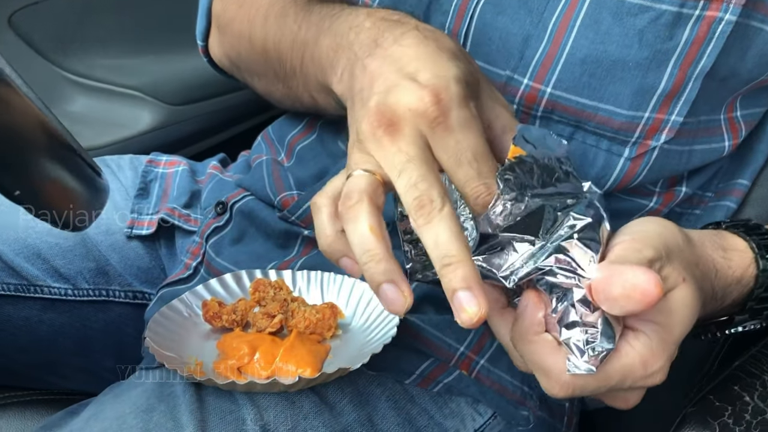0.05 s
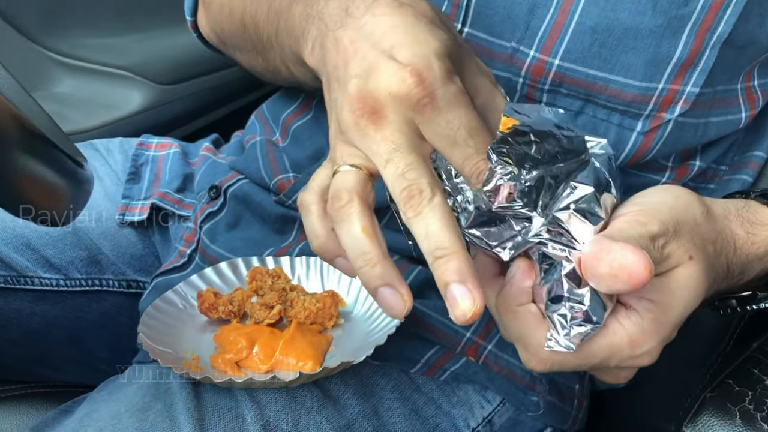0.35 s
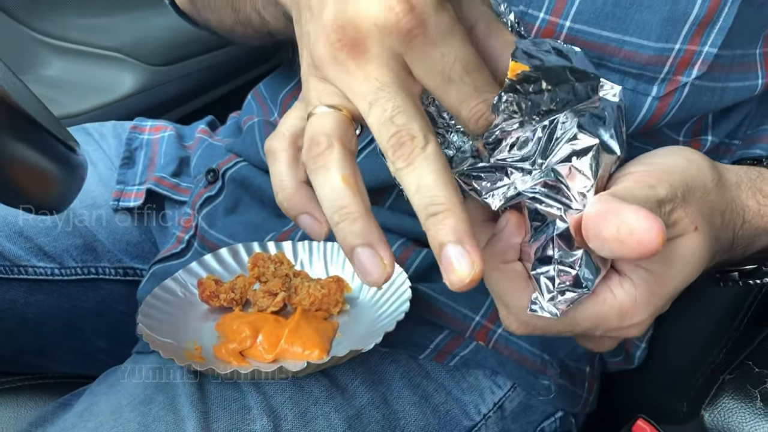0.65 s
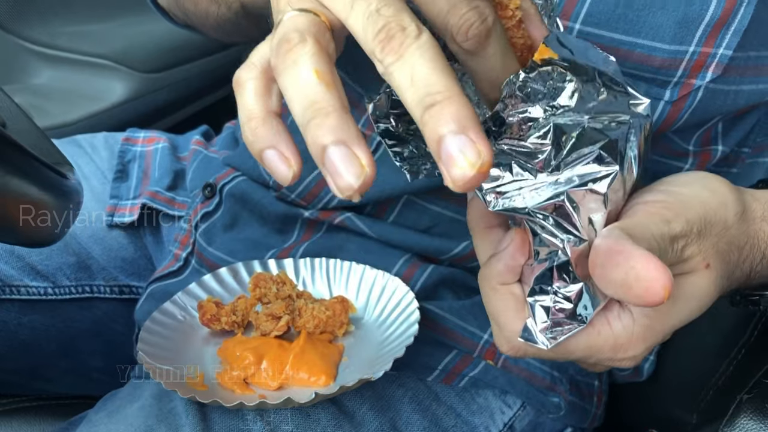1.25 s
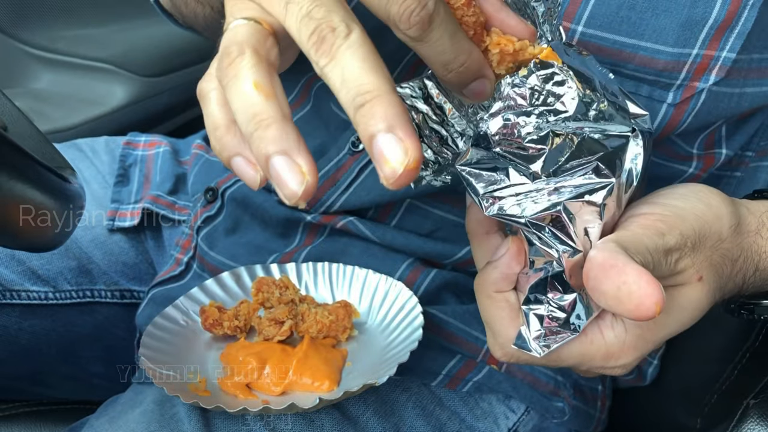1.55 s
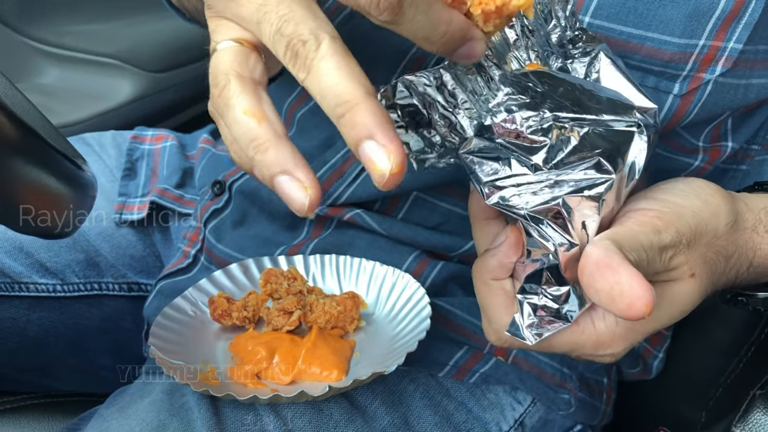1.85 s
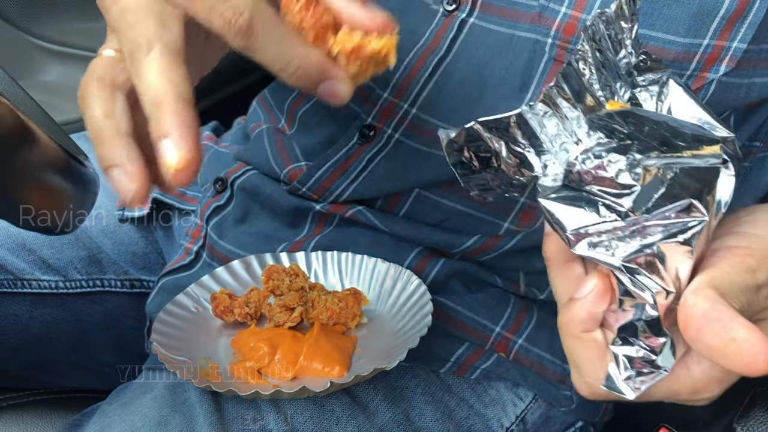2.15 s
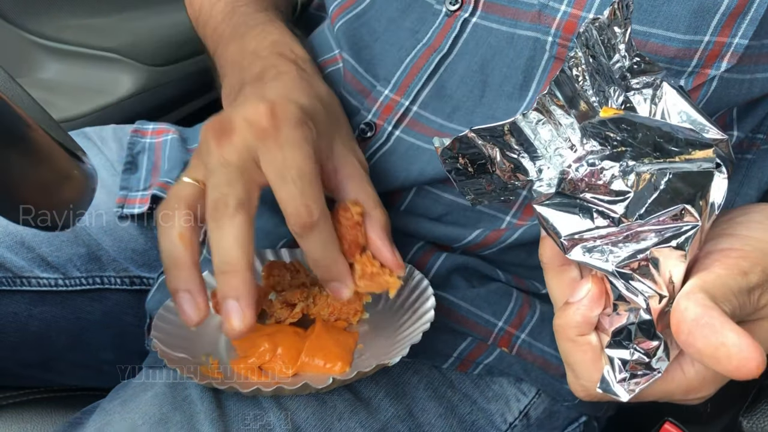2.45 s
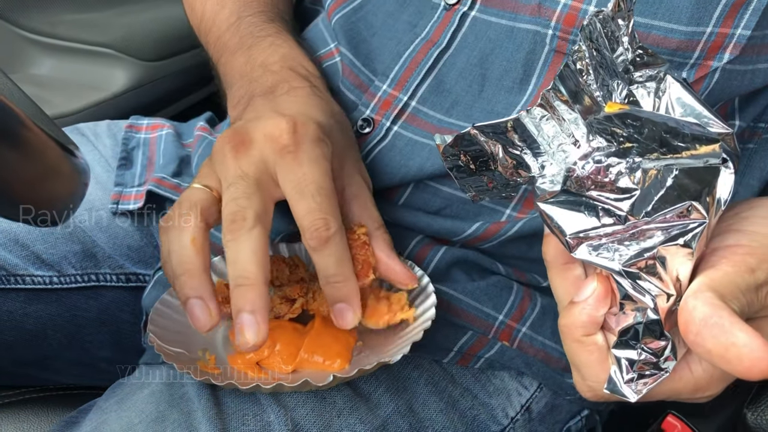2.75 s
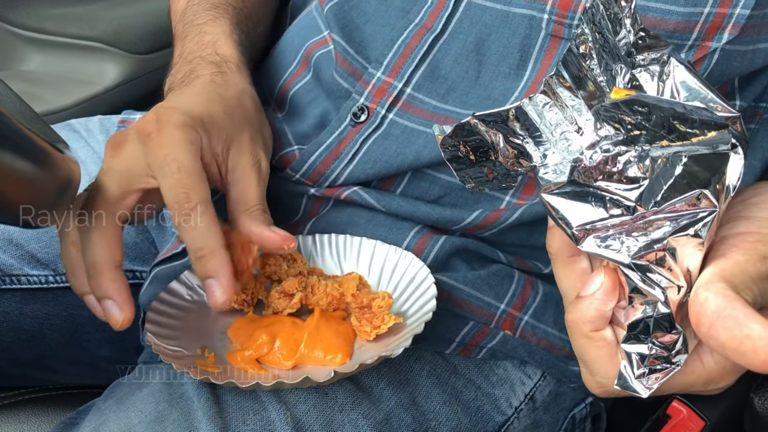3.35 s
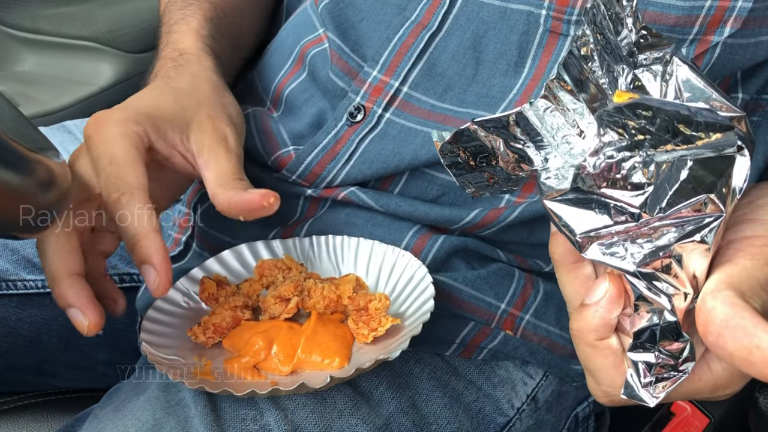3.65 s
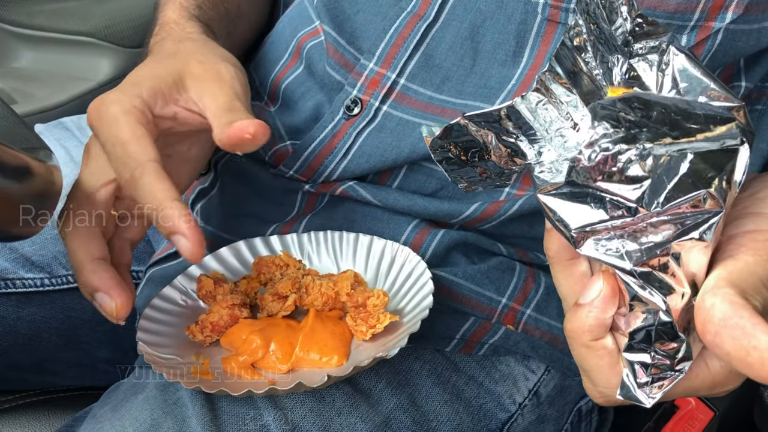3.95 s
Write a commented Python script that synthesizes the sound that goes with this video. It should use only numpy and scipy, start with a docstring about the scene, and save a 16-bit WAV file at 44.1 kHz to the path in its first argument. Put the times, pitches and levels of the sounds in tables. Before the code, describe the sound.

A foil pouch crinkles and snaps sharply as fried food is worked out of it. The foil settles, then light ticks and a soft drop land on a paper plate, close to the microphone in a quietly rumbling car.

```python
"""Inside a quiet parked car, one microphone close to a foil pouch and a paper plate on a lap.
From the start, over the cabin's low rumble, a piece of fried food is worked out of the pouch: creases
snap, each with its own short ring, amid fine crinkles and the dull flexing of the sheet.
By 2.3 s the foil has settled, and crust and fingers tick on the plate.
Near 3.5 s the food drops onto it with a short skid, and a sleeve rustles as the hand draws back."""
import sys
import numpy as np
from scipy import signal
from scipy.fft import rfft, irfft, next_fast_len
from scipy.io import wavfile

SR = 44100
rng = np.random.default_rng(int(sys.argv[2]) if len(sys.argv) > 2 else 0)


def unload_audio(sound):
    """Save the sound as a 16-bit wav file, at the path given as the first command line argument."""
    columns = np.transpose(np.atleast_2d(sound))
    # keep every value between -1 and 1, then stretch to whole-number steps
    steps = np.round(np.clip(columns, -1, 1) * 32767)
    wavfile.write(sys.argv[1], SR, steps.astype(np.int16))


N = 176400

# foil creases snapping: (time [s], level [dB], ring [Hz], treble [dB])
CREASE_SNAPS = [(0.0111, -20.5, 6200, -13), (0.0188, -15.5, 6700, 15), (0.0358, -15, 7300, 14),
                (0.0604, -27, 7400, 4), (0.0725, -20, 6700, -3.5), (0.0861, -27, 1960, -3),
                (0.1732, -26.5, 3500, 3), (0.192, -23.5, 1650, -3.5), (0.2329, -30.5, 3440, 1.5),
                (0.2932, -31.5, 5940, 3), (0.3146, -30, 1800, 6), (0.3321, -28, 9100, -9),
                (0.3644, -24, 2640, -5), (0.3774, -22, 1690, -6), (0.3959, -24.5, 4030, -16),
                (0.4065, -32, 5000, 3), (0.422, -18, 8350, -2), (0.4384, -21.5, 1520, -1),
                (0.453, -30, 4900, 16), (0.4573, -22, 12200, -7), (0.4973, -25.5, 5450, -11),
                (0.5156, -17.5, 6980, -6.5), (0.5415, -19.5, 5030, -3.5), (0.5442, -18, 1780, 8),
                (0.555, -23, 11200, -3), (0.588, -21, 5050, -5.5), (0.6211, -25, 5470, -1),
                (0.6392, -28, 3700, -11), (0.6514, -24.5, 1500, -5), (0.7071, -27, 2730, -37),
                (0.7394, -26.5, 2500, -18), (0.7525, -33, 2410, -31), (0.7923, -18, 6060, -10.5),
                (0.795, -20.5, 2970, 8), (0.8151, -22, 3020, 3), (0.8435, -12, 5470, 5),
                (0.845, -22.5, 1600, 8), (0.8537, -24, 9800, 17), (0.8617, -24, 12500, 9),
                (0.8717, -31, 11000, 3), (0.8744, -20, 1500, -4), (0.8997, -29, 5500, 3),
                (0.9061, -25.5, 4540, -6), (0.9346, -20.5, 2360, -9), (0.94, -23.5, 4300, 6),
                (0.9491, -21, 10700, -4), (1.0023, -23.5, 2240, -7), (1.016, -27.5, 6120, -1),
                (1.083, -19.5, 3770, -4.5), (1.0941, -29, 2900, -3), (1.1237, -15.5, 3300, -2.5),
                (1.1508, -28.5, 1840, -25), (1.1585, -29, 1850, -5), (1.1812, -21, 1400, -7.5),
                (1.2129, -31, 4330, -19), (1.2277, -26, 7000, -6), (1.2492, -22, 6300, 0),
                (1.2522, -20, 2630, -10.5), (1.2729, -28, 5500, -8), (1.3098, -33, 4120, -38),
                (1.3512, -31, 4700, -9), (1.404, -33, 1720, -23), (1.441, -27.5, 9100, -5),
                (1.4644, -30, 4900, -7), (1.484, -33, 1420, -21), (1.5102, -34, 1690, -12),
                (1.5197, -34, 2730, -15), (1.5279, -30, 4300, -3), (1.6005, -44.5, 1660, -47),
                (1.6632, -33.5, 2680, -12), (1.8127, -37, 5150, -11.5), (1.9453, -34, 980, -10.5),
                (1.969, -33.5, 1540, -15), (2.0703, -30.5, 3000, -13), (2.0735, -42, 1700, -22),
                (2.1025, -43.5, 2090, -15), (2.1772, -47, 1760, -30), (2.1926, -42, 1440, -5)]
# spectrum of a crack: (frequency [Hz], level [dB])
CRACK_SPECTRUM = [(100, -7.5), (300, -13), (1000, -7), (1800, -2.5), (8000, 2.5), (16000, -1)]
# fine crinkling, following how hard the foil is worked: (time [s], level [dB])
CRINKLE_LEVEL = [(0, -26), (.04, -31.5), (.095, -37.5), (.215, -49), (.283, -60), (.3, -38.5), (.35, -44.5),
                 (.42, -35.5), (.46, -43), (.488, -53), (.51, -33.5), (.535, -35), (.55, -28),
                 (.605, -45.5), (.7, -41.5), (.745, -42.5), (.78, -52), (.8, -34.5), (.85, -28.5),
                 (.89, -49), (.945, -45), (.98, -48.5), (1.01, -33), (1.1, -36), (1.26, -41.5), (1.31, -48),
                 (1.5, -51.5), (1.57, -68), (1.84, -59.5), (1.91, -65.5), (1.97, -57), (2.03, -72),
                 (2.18, -65), (2.26, -81)]
# spectrum of the crinkling: (frequency [Hz], level [dB])
CRINKLE_SPECTRUM = [(1100, -7), (1700, -2.5), (2500, -1), (4500, -2), (13500, -8.5), (16000, -10.5)]
# dull flexing of the pouch: (time [s], level [dB])
FLEX_LEVEL = [(0, -43), (.12, -47.5), (.27, -60), (.33, -50.5), (.49, -52), (.54, -43.5), (.62, -46.5),
              (.77, -53.5), (.84, -38), (.9, -56), (.98, -49.5), (1.03, -45), (1.17, -44), (1.25, -43),
              (1.5, -52.5), (1.6, -61), (1.96, -57.5), (2.25, -68)]
# spectrum of the flexing: (frequency [Hz], level [dB])
FLEX_SPECTRUM = [(90, -23.5), (170, -12.5), (250, -2.5), (460, 3.5), (750, -5), (1050, -2.5), (4000, -27)]
# a whole panel buckles: (time [s], level [dB], pitch [Hz])
PANEL_BUCKLES = [(0.539, -35, 627), (0.839, -35, 250), (1.221, -36.5, 221), (1.258, -34, 205)]
# hollow resonances of the pouch: (frequency [Hz], width [Hz], gain [dB])
POUCH_RESONANCES = [(772, 86, 0.5), (1410, 85, -8.5), (1734, 70, 0.5)]
# food rubbing along the inside of the pouch: (time [s], level [dB])
RUB_LEVEL = [(1.0, -55), (1.45, -53.5), (1.56, -67), (2.18, -68), (2.3, -97)]
# crust and fingers ticking on the plate: (time [s], level [dB], ring [Hz], treble [dB])
PLATE_TICKS = [(2.4268, -36, 4470, -14), (2.481, -48.5, 1680, -21), (2.5399, -44.5, 2180, -21),
               (2.5784, -54, 2150, -32), (2.753, -52.5, 6960, 4), (2.9577, -40, 4650, -3),
               (3.0047, -45, 1590, -30), (3.1159, -42, 1470, -70), (3.216, -56.5, 1220, -68),
               (3.4764, -48.5, 1080, -16.5), (3.5365, -38.5, 1480, -8), (3.5443, -36, 1380, -30),
               (3.5548, -26, 4140, -22), (3.5664, -34, 5700, -8), (3.5972, -39, 2000, -9),
               (3.6141, -42, 1430, -31)]
# the food lands on the plate: (time [s], level [dB])
FOOD_LANDINGS = [(3.546, -42), (3.598, -35), (3.607, -45), (3.614, -54)]
# modes of the plate on the lap: (frequency [Hz], gain [dB], t60 [s])
PLATE_MODES = [(103, -1, 0.088), (241, 5.5, 0.047), (430, 10, 0.027), (640, -1, 0.065), (746, -2, 0.044)]
# the sleeve drawing back over the clothes: (time [s], level [dB])
SLEEVE_LEVEL = [(3.4, -72), (3.55, -56)]
# spectrum of the cabin's rumble: (frequency [Hz], level [dB])
RUMBLE_SPECTRUM = [(32, -34), (42, -1), (75, 1.5), (105, -6), (140, -7), (190, -17), (280, -14),
                   (400, -21.5), (700, -27), (1050, -38), (2400, -44.5), (16000, -49.5)]
# low hums of the cabin: (frequency [Hz], width [Hz], level [dB])
CABIN_HUMS = [(60.8, 12, -49.5), (255, 14.4, -62.5), (308.7, 7.5, -62.5)]
# a low drone swells and fades: (time [s], level [dB])
DRONE_LEVEL = [(0, -66), (1.8, -47), (2.15, -53), (2.32, -47.5), (2.44, -58), (2.58, -40.5), (2.72, -61),
               (4, -56)]
# a faint hiss rises near the end: (time [s], level [dB])
HISS_LEVEL = [(3.3, -77), (3.6, -71.5)]


def snaps(rows, material_db=0, size=2048):
    """A crease gives way in two cracks; its facet rings and pings, and the sheet shivers after it."""
    crack_s, ping_s, ring_cycles = 0.00045, 0.003, 2.2  # decays to 1/e
    level_window_s = 0.0019  # a snap's level is its energy spread over this time
    out, t = np.zeros(N), np.arange(size) / SR
    for s, db, hz, treble_db in rows:
        burst, shiver, rattle = rng.standard_normal((3, size))
        since_second = t - 0.0011 * rng.uniform(.5, 1.7)
        second_step = from_db(-6.5) * (since_second > 0) * np.exp(-np.abs(since_second) / crack_s)
        steps = np.exp(-t / crack_s) + second_step
        noise = rms_one(burst * steps) + from_db(-1) * rms_one(shiver * dying(t, t60=0.04))
        treble_shelf = [(min(4900, 2 * hz), 0), (10660, treble_db)]
        crack = colour(colour(noise, CRACK_SPECTRUM), treble_shelf)
        ring = np.sin(2 * np.pi * hz * t) * np.exp(-t * hz / ring_cycles)
        ping = resonate(rattle * np.exp(-t / ping_s), hz, width_hz=250)
        facet = from_db(-7.5) * rms_one(ring) + from_db(-9) * rms_one(ping)
        # light snaps ring in one facet; hard ones shake the whole sheet
        lightness_db = 1.5 * np.tanh((-34.5 - db) / 10)
        dullness_db = -0.36 * max(treble_db, -16)  # dull snaps are the most pitched
        snap = rms_one(rms_one(crack) + from_db(material_db + lightness_db + dullness_db) * facet)
        add(out, s, from_db(db) * np.sqrt(level_window_s * SR / size) * snap)
    return out


def crinkles(size=512):
    """Tiny creases give way by the hundred; each shivers briefly at a pitch of its own."""
    shiver_s, ring_cycles = 0.001, 1.8  # decays to 1/e
    settled = int(CRINKLE_LEVEL[-1][0] * SR)
    clicks = random_clicks(per_s=1900, spread_db=2.5)
    rings, fade = np.zeros(N), np.exp(-np.arange(size) / SR / shiver_s)
    for i in np.flatnonzero(clicks[:settled]):
        hz = np.exp(rng.uniform(np.log(1200), np.log(15000)))
        facet = resonate(rng.standard_normal(size) * fade, hz, hz / ring_cycles / np.pi)
        add(rings, i / SR, clicks[i] * np.sqrt(hz) * rms_one(facet))
    rings = colour(rings, CRINKLE_SPECTRUM)
    return from_db(-1.5) * level(CRINKLE_LEVEL) * rings / np.std(rings[:settled])


def flexing(buckle_width_hz=103):
    """Larger panels give with soft, low pops, and now and then buckle with a dull shudder."""
    pops = colour(random_clicks(per_s=450, spread_db=3.5), FLEX_SPECTRUM)
    out, t = level(FLEX_LEVEL) * rms_one(pops), np.arange(SR // 4) / SR
    for s, db, hz in PANEL_BUCKLES:
        band = resonate(rng.standard_normal(len(t)), hz, buckle_width_hz)
        shudder = resonate(band, hz, buckle_width_hz)
        add(out, s, from_db(db) * rms_one(shudder) * dying(t, t60=0.11))
    return out


def pouch(x, block=256, shapes=33, wander=0.06):
    """The half-open pouch adds hollow resonances that wander as the hands reshape it."""
    out, starts = x.copy(), np.arange(0, N, block)
    for hz, width_hz, db in POUCH_RESONANCES:
        drift = np.interp(starts, np.linspace(0, N, shapes), rng.standard_normal(shapes))
        r, state = np.exp(-np.pi * width_hz / SR), np.zeros(2)
        for i, centre_hz in zip(starts, hz * np.exp(wander * drift)):
            poles = [1, -2 * r * np.cos(2 * np.pi * centre_hz / SR), r * r]
            ring, state = signal.lfilter([1, 0, -1], poles, x[i:i + block] + 1e-18, zi=state)
            out[i:i + block] += from_db(db) * (1 - r * r) / 2 * ring
    return out


def rub():
    """The food rubs along the inside of the pouch on its way out."""
    return level(RUB_LEVEL) * narrow_noise(hz=1700, width_hz=460)


def ticks():
    """Crust and fingers tick on the plate; paper rings less than foil."""
    return from_db(-1) * snaps(PLATE_TICKS, material_db=-2)


def landings():
    """Each landing of the food strikes the low modes of the paper plate."""
    out, t = np.zeros(N), np.arange(SR // 4) / SR
    attack = 1 - np.exp(-t / 0.00038)  # the food is soft
    for s, db in FOOD_LANDINGS:
        signs = rng.choice([-1, 1], len(PLATE_MODES))
        thud = sum(sign * from_db(db + mode_db) * np.sin(2 * np.pi * hz * t) * dying(t, t60)
                   for sign, (hz, mode_db, t60) in zip(signs, PLATE_MODES))
        add(out, s, attack * thud)
    return out


def skid(start_s=3.543):
    """Grains of crust catch on the paper in a short, rough scrape as the food lands."""
    out, t = np.zeros(N), np.arange(N) / SR
    grains = resonate(random_clicks(per_s=1900, spread_db=2.5), hz=1900, width_hz=960)
    add(out, start_s, from_db(-46) * rms_one(grains) * dying(t, t60=0.16))
    return out


def sleeve(hz=190, width_hz=203):
    """Cloth slides over cloth with a soft, low rustle."""
    rustle = resonate(narrow_noise(hz, width_hz), hz, 2 * width_hz)
    return level(SLEEVE_LEVEL) * rms_one(rustle)


def cabin_reflections(x, cutoff_hz=9400):
    """The direct sound reaches the microphone first, then the short, dull tail of the cabin."""
    t = np.arange(SR // 4) / SR
    reflections = rng.standard_normal(len(t)) * (t > .001)
    tail = signal.lfilter(*signal.butter(1, cutoff_hz, fs=SR), reflections) * dying(t, t60=0.11)
    return x + from_db(-14.5) * signal.fftconvolve(x, tail / np.linalg.norm(tail))[:N]


def cabin_tone():
    """Room tone of the parked car: low rumble, hums, a swelling drone and a faint hiss."""
    rumble = from_db(-46) * rms_one(colour(rng.standard_normal(N + SR), RUMBLE_SPECTRUM)[SR:])
    hums = sum(from_db(db) * narrow_noise(hz, width_hz) for hz, width_hz, db in CABIN_HUMS)
    drone = level(DRONE_LEVEL) * narrow_noise(hz=108.3, width_hz=5.7)
    hiss = level(HISS_LEVEL) * narrow_noise(hz=3350, width_hz=810)
    return rumble + hums + drone + hiss


def from_db(db):
    """Decibels to gain."""
    return 10 ** (np.asarray(db) / 20)


def rms_one(x):
    """Scale to rms 1."""
    return x / np.sqrt(np.mean(x ** 2) + 1e-20)


def level(rows):
    """Gain at every sample from (time [s], level [dB]) rows."""
    return from_db(np.interp(np.arange(N) / SR, *np.transpose(rows)))


def colour(x, points):
    """Causal (minimum-phase) filter through (frequency [Hz], level [dB]) points."""
    size = 2 * next_fast_len(len(x))
    hz, db = np.transpose(points)
    grid_hz = np.maximum(np.arange(size // 2 + 1) * SR / size, 1)
    gain = from_db(np.interp(np.log(grid_hz), np.log(hz), db))
    cepstrum = irfft(np.log(gain))
    cepstrum[1:size // 2] *= 2
    cepstrum[size // 2 + 1:] = 0
    return irfft(rfft(x, size) * np.exp(rfft(cepstrum)))[:len(x)]


def resonate(x, hz, width_hz):
    """Two-pole resonance with gain 1 at its peak."""
    r = np.exp(-np.pi * width_hz / SR)
    poles = [1, -2 * r * np.cos(2 * np.pi * hz / SR), r * r]
    return signal.lfilter(np.array([1, 0, -1]) * (1 - r * r) / 2, poles, x + 1e-18)


def narrow_noise(hz, width_hz):
    """Noise in one resonance, rms 1."""
    return rms_one(resonate(rng.standard_normal(N + SR), hz, width_hz)[SR:])


def random_clicks(per_s, spread_db):
    """Clicks at random moments, many small and a few large."""
    sizes = from_db(spread_db * np.minimum(rng.exponential(1, N), 4))
    return sizes * rng.choice([-1, 1], N) * (rng.random(N) < per_s / SR)


def dying(t, t60):
    """Exponential decay that loses 60 dB in t60 seconds."""
    return np.exp(-np.log(1000) * t / t60)


def add(out, s, x):
    """Mix x into out from time s."""
    i = int(s * SR)
    out[i:i + len(x)] += x[:N - i]


def scene():
    """Foil and plate close to the microphone, the cabin all around; mono."""
    foil = pouch(from_db(-0.34) * snaps(CREASE_SNAPS) + crinkles() + flexing())
    food = rub() + ticks() + landings() + skid()
    return (cabin_reflections(foil + food) + cabin_tone() + sleeve())[None]


def record(dry):
    """The microphone chain: a low cut at 34 Hz and a steep top cut at 15.9 kHz."""
    low_cut = signal.butter(4, 34, "high", fs=SR, output="sos")
    top_cut = signal.firwin(255, 15900, fs=SR, window="blackman")
    return signal.fftconvolve(signal.sosfilt(low_cut, dry), top_cut[None], "same")


dry = scene()
out = record(dry)
unload_audio(out)
```